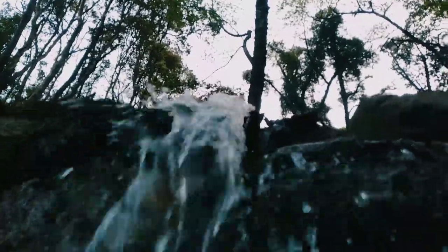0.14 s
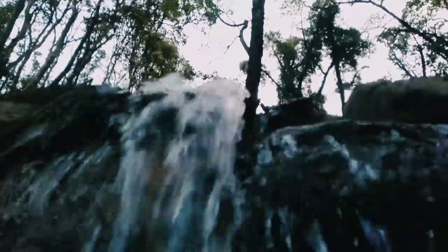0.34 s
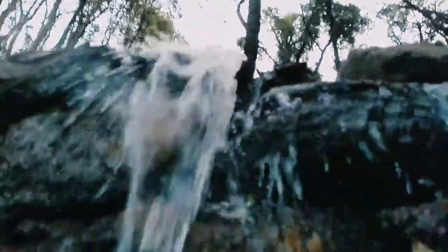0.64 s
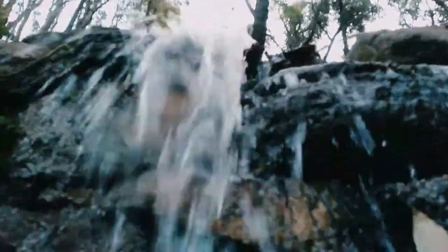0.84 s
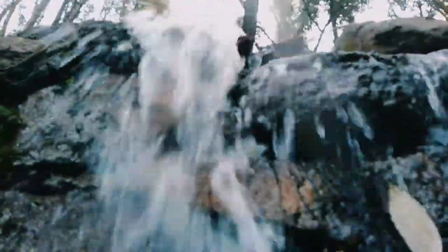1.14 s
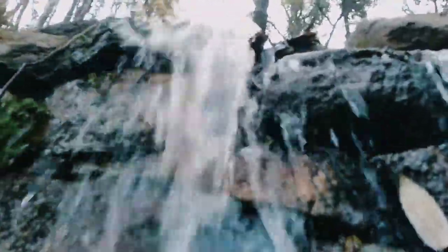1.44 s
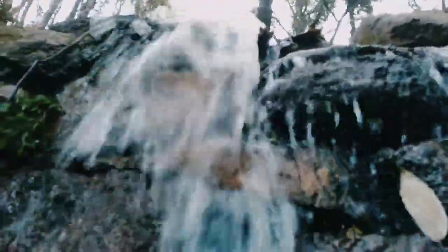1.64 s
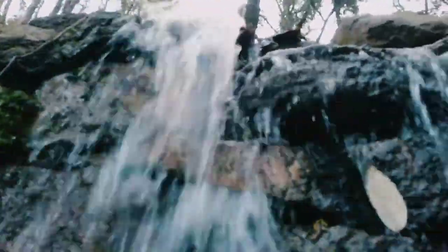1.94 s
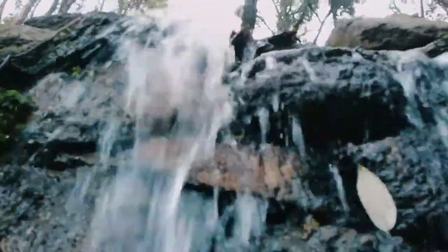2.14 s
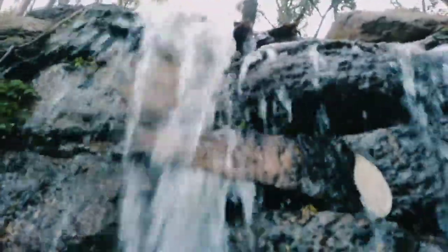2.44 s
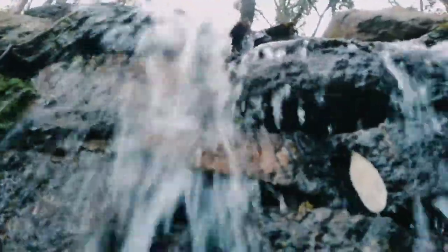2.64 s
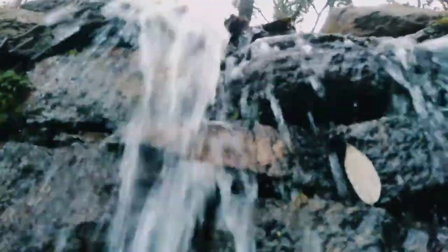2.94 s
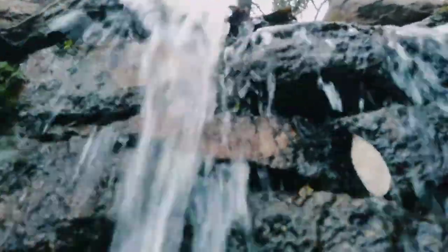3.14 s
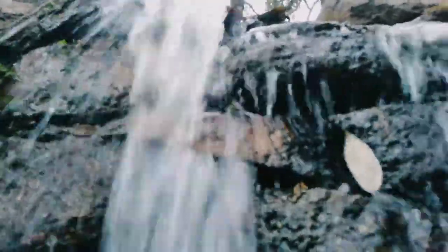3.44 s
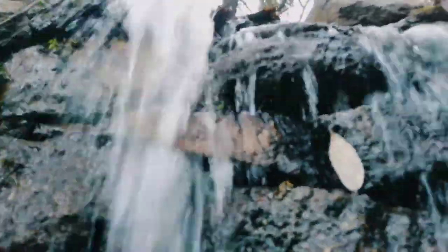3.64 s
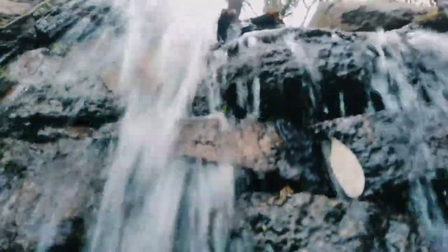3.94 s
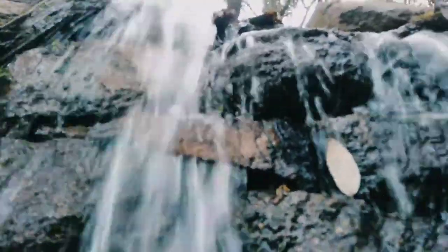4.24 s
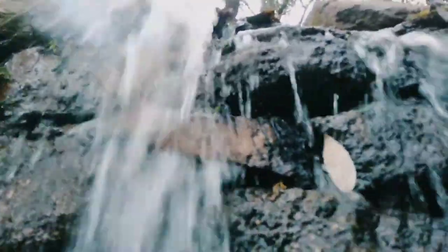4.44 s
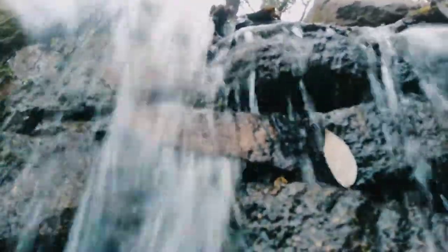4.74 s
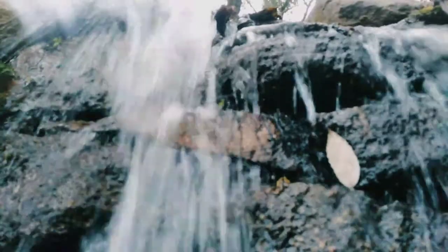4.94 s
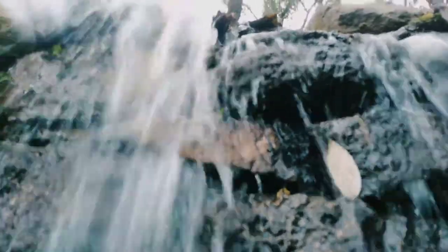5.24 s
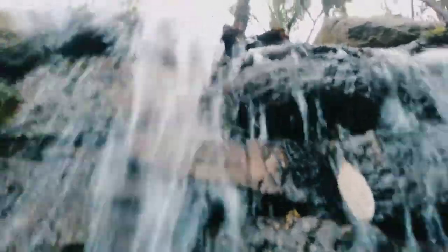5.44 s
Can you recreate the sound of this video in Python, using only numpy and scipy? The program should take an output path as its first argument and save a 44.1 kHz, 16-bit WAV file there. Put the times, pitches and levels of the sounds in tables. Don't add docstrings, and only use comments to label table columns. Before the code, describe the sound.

A small fall hisses and spatters loudly on stone, turns hollow under low thumps, cuts to silence, then resumes as a faint steady wash.

```python
import sys
import numpy as np
from scipy import signal
from scipy.io import wavfile
from scipy.ndimage import uniform_filter1d, map_coordinates

SR = 44100
rng = np.random.default_rng(int(sys.argv[2]) if len(sys.argv) > 2 else 0)


def output_pcm(signal):
    pcm = np.clip(np.atleast_2d(signal).T, -1, 1) * 32767
    wavfile.write(sys.argv[1], SR, np.round(pcm).astype(np.int16))


def gain_from_db(level_db):
    decades = np.asarray(level_db, float) / 20
    return 10 ** decades


N = 246959
CUT_S, RESUME_S = 2.3381, 2.5494

# freq_hz [Hz], level_db [dB per Hz]
WATER_COLOUR = [(24, -42.5), (50, -15), (130, -8.5), (335, -14.5), (550, -4), (900, -2), (1500, -1.5),
                (4200, -6), (6500, -1), (8000, -9), (10300, -12), (12800, -10.5), (15600, -0.5),
                (17000, -9)]


def evened(x):
    return x / np.sqrt(np.mean(x ** 2) + 1e-20)


def curve(rows, column):
    rows = np.array(rows)
    return np.interp(np.arange(N) / SR, rows[:, 0], rows[:, column])


def colour(x, points, size=4096):
    f, db = np.transpose(points)
    hz = abs(np.fft.fftfreq(size, 1 / SR))
    gain_db = np.interp(np.log(hz + 1), np.log(f + 1), db)
    log_gain = np.log(gain_from_db(gain_db.clip(-80)))
    taps = np.fft.ifft(np.exp(np.conj(signal.hilbert(log_gain)))).real
    return signal.oaconvolve(x, taps[:size // 2])[:len(x)]


def drift(seconds):
    size = max(round(seconds * SR), 1)
    once = uniform_filter1d(rng.standard_normal(N), size)
    return evened(uniform_filter1d(once, size))


def drops(per_s, spread_db):
    sign, size, chance = rng.random((3, N))
    height = gain_from_db(-spread_db * np.log(size).clip(-3))
    return np.sign(sign - 0.5) * height * (chance < per_s / SR)


def bubble(hz, cycles, glide):
    turns = np.arange(int(3 * cycles / hz * SR)) * hz / SR
    note = np.sin(2 * np.pi * turns * (1 + glide * turns / cycles))
    return note * np.exp(-2 * turns / cycles) * np.sqrt(hz / cycles)


def spray(patchy_db=1.5, flicker_db=1.03, surge_db=1.07):
    a, b, patches = rng.standard_normal((N // 64 + 5, 129, 3)).T
    patches = uniform_filter1d(patches, size=8, axis=1)
    patches = evened(uniform_filter1d(patches, size=9, axis=0))
    spectrum = (a + 1j * b) * gain_from_db(patchy_db * patches)
    hiss = signal.istft(spectrum, nperseg=256, noverlap=192)[1][:N]
    return evened(hiss * gain_from_db(flicker_db * drift(0.0045) + surge_db * drift(0.02)))


def spatter():
    t = np.arange(400) / SR
    puffs = signal.oaconvolve(abs(drops(220, spread_db=3.5)), np.exp(-t / 0.0012))[:N]
    clicks = 0.8 * drops(100, spread_db=6.0)
    return evened(puffs * rng.standard_normal(N) + clicks)


def gurgle():
    out = np.zeros(N)
    for k, hz in enumerate(np.geomspace(240, 7200, 30)):
        per_s = 20 + hz / 60
        clumps = drops(per_s, spread_db=3.6) * gain_from_db(3.5 * drift(0.025))
        notes = signal.oaconvolve(clumps, bubble(hz, 5 + 3.5 * (k % 3), 0.05))[:N]
        out += hz ** 0.2 / np.sqrt(per_s) * notes
    return evened(out)


def plunks():
    # start_s [s], peak_db [dB], pitch_hz [Hz]
    air_pockets = [(0.01, -44, 970), (0.09, -38.5, 545), (0.182, -43.5, 514), (0.46, -34, 1540),
                   (0.544, -37.5, 582), (0.719, -39, 1080), (0.782, -31.5, 2220), (0.788, -33, 1720),
                   (0.801, -35, 460), (0.606, -37.5, 1150), (1.217, -48.5, 272), (1.272, -31, 544),
                   (1.379, -31.5, 843), (1.449, -34, 848), (1.511, -31, 1093), (2.631, -45, 1890),
                   (2.642, -51, 820), (3.268, -46, 837), (3.466, -45.5, 1074), (3.659, -48, 1990),
                   (3.946, -47, 660), (4.023, -51, 753), (4.185, -61, 332), (4.203, -49.5, 1110),
                   (4.032, -49, 1070), (4.655, -61.5, 215), (4.75, -63, 398), (5.091, -50.5, 557),
                   (5.133, -54, 510), (5.42, -59.5, 226)]
    # start_s [s], peak_db [dB], pitch_hz [Hz], t60_s [s], rise [per s]
    gloop = (3.305, -58, 230, .14, 24)
    # start_s [s], peak_db [dB], pitch_hz [Hz], t60_s [s], rise [per s]
    plop = (0.8668, -19, 620, .012, 1.5)
    rise_per_s = 0.95
    rough = 0.5
    rows = []
    for s, db, hz in air_pockets:
        t60_s = 0.051 * (1000 / hz) ** 0.38
        rows.append((s, db, hz, t60_s, rise_per_s))
    out, t = np.zeros(N + SR), np.arange(5000) / SR
    for s, db, hz, t60_s, rise in rows + [gloop, plop]:
        shape = gain_from_db(db + 3.5 - 60 * t / t60_s) * (1 - np.exp(-t / 0.0039))
        shape = shape * (rise * t < 0.8)
        out[round(s * SR):][:len(t)] += shape * np.sin(2 * np.pi * hz * t * (1 + rise * t))
    return out[:N] * (np.sqrt(1 - rough ** 2) + rough * drift(0.0027))


def splashes():
    # start_s [s], peak_db [dB], pitch_hz [Hz]
    loud_splashes = [(0.093, -24, 770), (0.166, -23.5, 537), (0.201, -24, 1810), (0.29, -27, 3430),
                     (0.344, -26, 6700), (0.386, -30, 1630), (0.419, -23, 1127), (0.466, -21.5, 1537),
                     (0.519, -26, 5550), (0.624, -25, 5840), (0.691, -22.5, 6750), (0.77, -27, 590),
                     (0.858, -23, 734), (0.921, -26, 6220), (0.97, -26, 1030), (1.051, -28, 705),
                     (1.268, -36, 540), (1.354, -23.5, 6580), (1.434, -25.5, 1780), (1.499, -25.5, 950),
                     (1.629, -24, 1135), (1.717, -29, 6500), (1.793, -26, 5800), (1.928, -23.5, 1032),
                     (2.044, -34, 1890), (2.084, -22.5, 1810)]
    # start_s [s], peak_db [dB], pitch_hz [Hz]
    soft_splashes = [(2.549, -50.5, 1470), (2.616, -40, 1590), (2.708, -37, 6500), (2.823, -46, 1510),
                     (2.868, -43, 1070), (2.972, -42.5, 1064), (3.019, -45, 1030), (3.106, -40, 6200),
                     (3.181, -41, 2300), (3.267, -39, 1540), (3.327, -36, 820), (3.661, -41, 1950),
                     (3.772, -53, 6500), (3.908, -44, 751), (4.138, -35.5, 6340), (4.237, -56, 6560),
                     (4.342, -43, 1080), (4.41, -38, 1620), (4.48, -36, 1120), (4.618, -43, 1410),
                     (4.677, -42, 3820), (4.708, -39.5, 6200), (4.81, -41, 6100), (4.855, -41.5, 433),
                     (5.211, -44, 1890), (5.297, -40, 848), (5.503, -43, 5440), (5.554, -41, 1900)]
    hiss_share, t60_s = 0.58, 0.051
    out, t = np.zeros(N + SR), np.arange(3000) / SR
    note_rise = 1 + 1.5 * t
    for s, db, hz in loud_splashes + soft_splashes:
        shape = gain_from_db(db - 60 * t / t60_s) * (1 - np.exp(-t / 0.0012))
        note = np.sin(2 * np.pi * hz * t * note_rise)
        puff = evened(colour(rng.standard_normal(len(t)), WATER_COLOUR, size=512))
        out[round(s * SR):][:len(t)] += shape * ((1 - hiss_share) * note + 0.74 * hiss_share * puff)
    return out[:N]


def ticks():
    # start_s [s], peak_db [dB]
    loud_ticks = [(0.155, -23), (0.2129, -31), (0.2932, -25), (0.3606, -33), (0.3865, -38), (0.4274, -26),
                  (0.5167, -30), (0.55, -30), (0.628, -31), (0.7422, -35), (0.9224, -23), (1.1543, -29.5),
                  (1.2685, -25), (1.298, -25), (1.6117, -33.5), (1.662, -29), (1.7185, -25),
                  (1.9275, -44.5), (2.0245, -36.5), (2.0453, -17)]
    # start_s [s], peak_db [dB]
    soft_ticks = [(2.6168, -42), (2.6677, -38), (2.6816, -39), (2.726, -44), (3.0422, -38), (3.1067, -45),
                  (3.169, -51), (3.3062, -48), (3.7732, -36), (3.9074, -45), (3.9627, -43), (4.1363, -49),
                  (4.4117, -53), (4.4816, -46), (4.5988, -43), (4.6756, -47), (4.7075, -49), (4.9071, -48),
                  (4.9744, -49), (5.1146, -45), (5.163, -36), (5.4703, -39)]
    t60_s, attack_s = 0.009, 0.0004
    out, t = np.zeros(N + SR), np.arange(1200) / SR
    for s, db in loud_ticks + soft_ticks:
        burst = np.diff(rng.standard_normal(len(t) + 1))
        puff = evened(colour(burst, WATER_COLOUR, size=512))
        shape = gain_from_db(db - 60 * t / t60_s) * (1 - np.exp(-t / attack_s))
        out[round(s * SR):][:len(t)] += shape * puff
    return out[:N]


def wind():
    # freq_hz [Hz], level_db [dB per Hz]
    wind_colour = [(12, -27.5), (25, -2), (55, 3.5), (100, -2.5), (150, -10.5), (210, -19), (300, -47.5),
                   (600, -82.5)]
    # centre_s [s], level_db [dB], length_s [s]
    gust_rows = [
        (1.478, -67, 0.054),
        (1.66, -64, 0.065),
        (1.795, -56, .03),
        (1.86, -52, 0.035),
        (1.926, -59.5, 0.089),
        (2.18, -59, .03),
        (2.287, -54.5, 0.071),
        (1.6, -70, .2),
    ]
    # centre_s [s], peak_db [dB], pitch_hz [Hz]
    thump_rows = [
        (1.774, -31, 76),
        (1.794, -37, 62),
        (1.808, -39.5, 45),
        (1.847, -64, 90),
        (1.864, -33.5, 78),
        (2.176, -42, 49.6),
        (2.231, -40, 72.6),
        (2.308, -42.5, 59.6),
    ]
    t = np.arange(N) / SR
    lumps = colour(rng.standard_normal(N) * gain_from_db(1.5 * drift(0.012)), wind_colour, size=16384)
    strength = np.full(N, gain_from_db(-80))
    for s, db, length_s in gust_rows:
        strength += gain_from_db(db) * np.exp(-((t - s) / length_s) ** 2)
    thumps = np.zeros(N)
    for s, db, hz in thump_rows:
        thumps -= gain_from_db(db) * np.cos(2 * np.pi * hz * (t - s)) * np.exp(-(4.1 * hz * (t - s)) ** 2)
    return strength * evened(lumps) + thumps


def resonate(x, hz, width_hz):
    turn = np.exp(2j * np.pi * np.cumsum(hz) / SR)
    r = np.exp(-np.pi * width_hz / SR)
    return 2 * (turn * signal.lfilter([1 - r], [1, -r], x / turn)).real


def hand(x):
    reach_s = 1.75
    n = np.arange(N)
    near = (n > reach_s * SR) & (n < RESUME_S * SR)
    close = ((n / SR - reach_s) / (CUT_S - reach_s)).clip(0, 1)

    def moving(far, closed, law=1.0):
        return far + (closed - far) * close ** law

    strength = near * moving(0.21, 0.58, 6.0)
    echo_hz = moving(2840, 4430, 0.55)
    echo = map_coordinates(x, [n - SR / echo_hz], order=1)
    combed = (x - strength * echo) / np.sqrt(1 + strength ** 2)
    cup = near * 2.52 * close ** 2.2 * resonate(x, moving(1800, 2390), 700)
    overtone = 0.39 * strength * resonate(x, moving(4300, 5160), 695)
    shade = near * 0.29 * close ** 0.45 * resonate(combed, moving(9000, 12200, 0.62), 1800)
    deadened = near * 0.38 * close * resonate(combed, np.full(N, 6500), 2000)
    return (combed + cup + overtone - shade - deadened) * gain_from_db(-3.0 * near * close)


def scene():
    # time_s [s], level_db [dB]
    passages = [
        [(0.0, -38.5), (0.2, -40.5), (0.45, -39.5), (0.85, -38), (1.0, -40.5), (1.2, -41.5), (1.3, -40),
         (2.33, -40.5)],
        [(2.56, -56), (2.7, -54), (3.0, -57), (3.3, -53), (3.6, -56.5), (4.0, -54.5), (4.2, -54.5),
         (4.8, -54.5), (5.3, -55.5), (5.6, -55)],
    ]
    water = spray() + gain_from_db(-6.5) * spatter() + gain_from_db(-6) * gurgle()
    flow_db = curve(passages[0] + passages[1], 1) + 1.0
    flow = gain_from_db(flow_db) * evened(colour(water, WATER_COLOUR))
    fall = flow + plunks() + gain_from_db(-2) * splashes() + ticks()
    mono = hand(fall) + wind() * (np.arange(N) < RESUME_S * SR)
    return np.array([mono, mono])


def limiter_gain():
    # start_s [s], depth_db [dB], hold_s [s]
    dips = [(0.126, 4.5, 0.044), (0.832, 6.5, 0.0048), (0.947, 5, .012), (1.736, 2, .02), (2.072, 4, 0.03),
            (2.9, 3.5, 0.056), (3.536, 8.5, 0.012), (4.06, 3, 0.095), (4.075, 4.5, 0.053),
            (4.366, 3.5, 0.044), (4.455, 3, 0.019), (4.676, 4, .015), (5.159, 5, 0.049)]
    # start_s [s], depth_db [dB], hold_s [s]
    plop_dip = (0.8722, 7.5, .046)
    recovery_s, ease_s = 0.023, 0.008
    t = np.arange(N) / SR

    def dip(s, db, hold_s):
        return db * (t > s) * np.clip(1 - (t - s - hold_s) / recovery_s, 0, 1)

    eased_db = uniform_filter1d(sum(dip(*row) for row in dips), size=round(ease_s * SR))
    sharp_db = uniform_filter1d(dip(*plop_dip), size=40)
    return gain_from_db(-eased_db - sharp_db)


def roll_off(x):
    return signal.sosfilt(signal.butter(12, 17120, fs=SR, output="sos"), x)


def record(dry):
    t = np.arange(N) / SR
    ceiling = 0.11
    gain = limiter_gain() * ((t < CUT_S) | (t > RESUME_S))
    rounded = ceiling * np.tanh(dry / ceiling) * gain
    edge = signal.firwin(1023, 15880, window=("kaiser", 10), fs=SR)
    mix = signal.oaconvolve(rounded, edge[None], "same")
    return roll_off(mix)


dry = scene()
out = record(dry)
output_pcm(out)
```